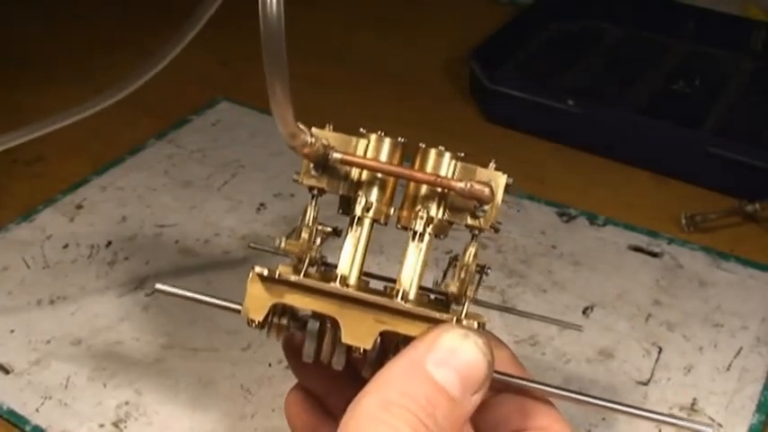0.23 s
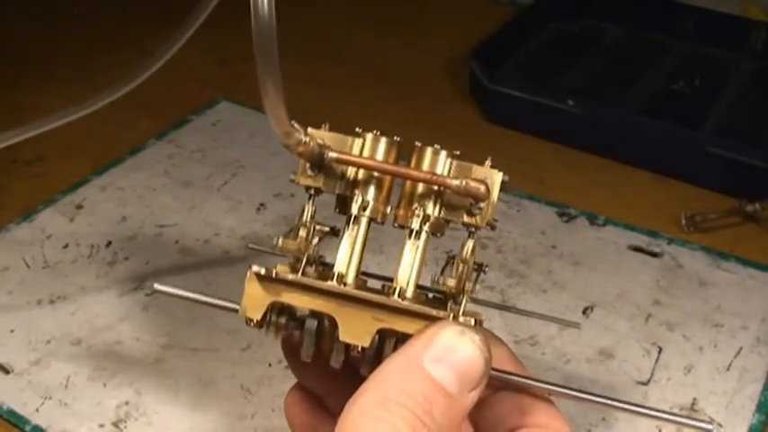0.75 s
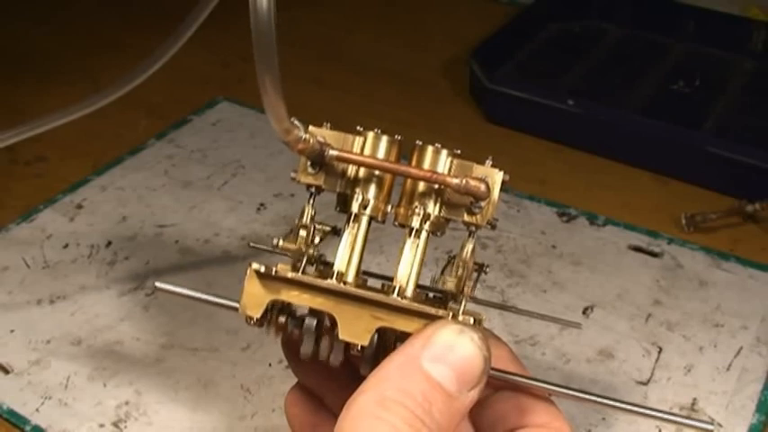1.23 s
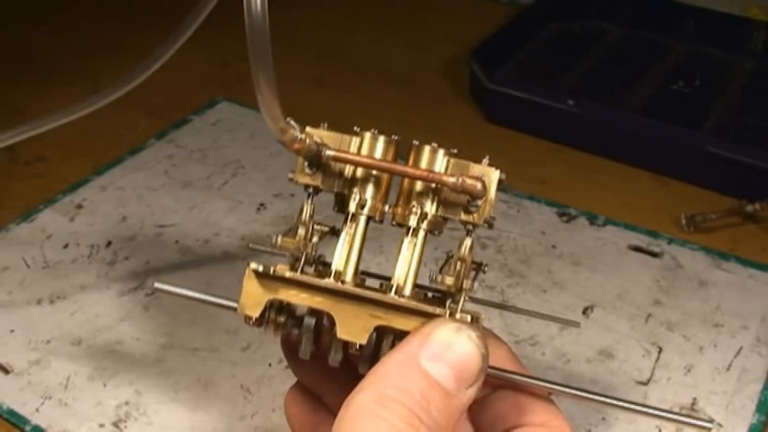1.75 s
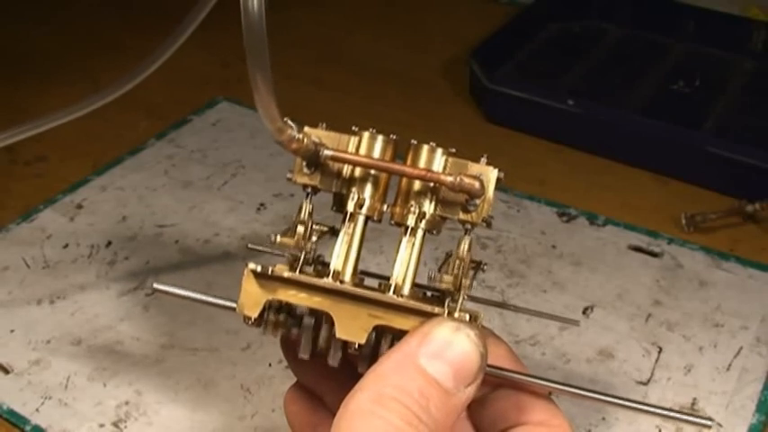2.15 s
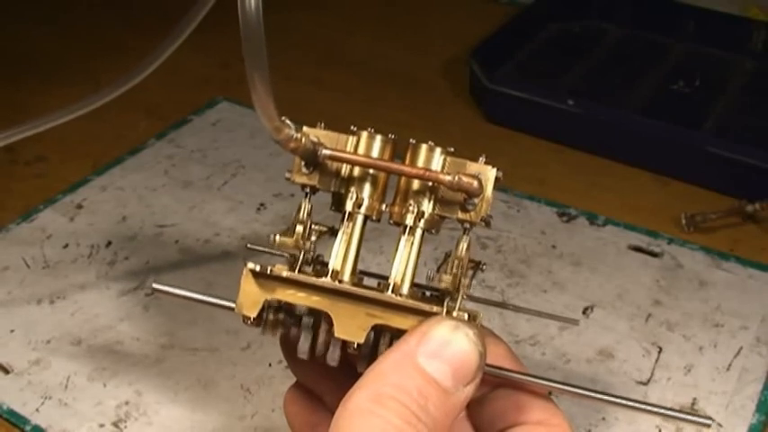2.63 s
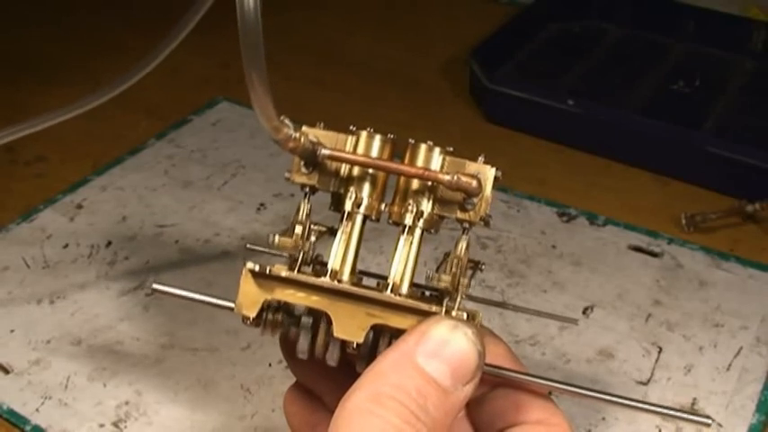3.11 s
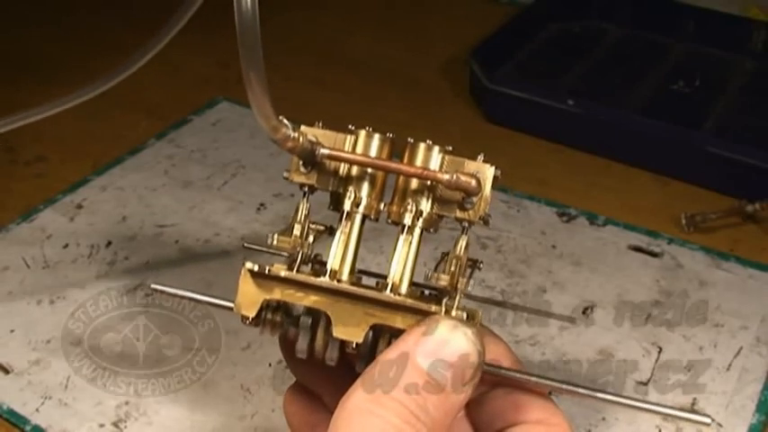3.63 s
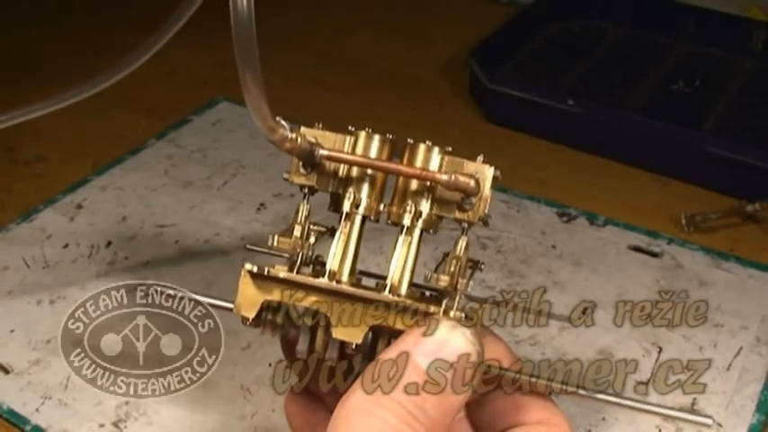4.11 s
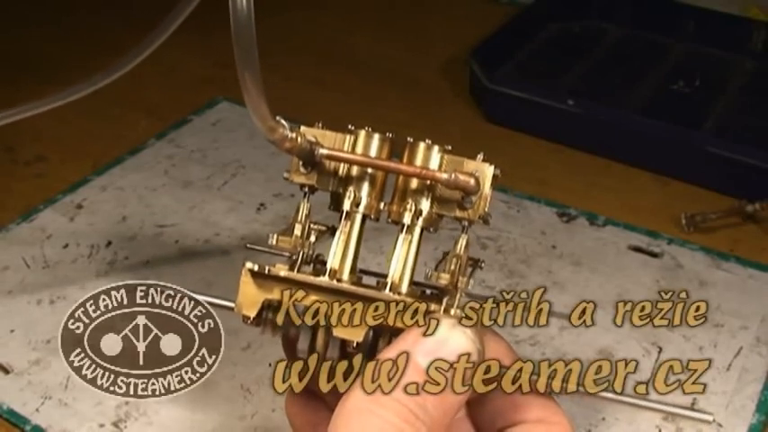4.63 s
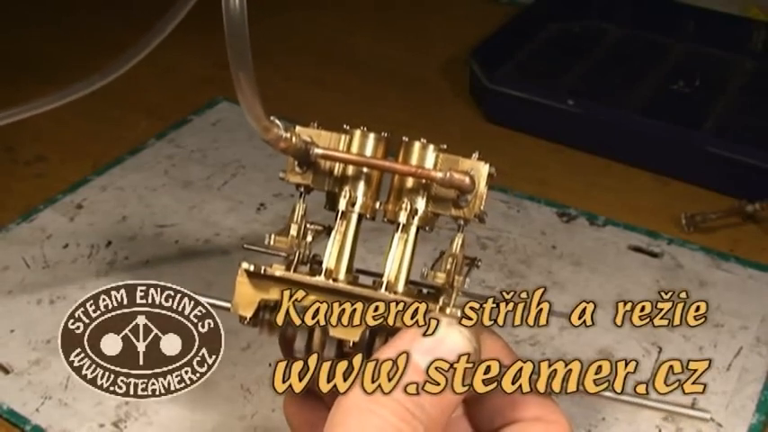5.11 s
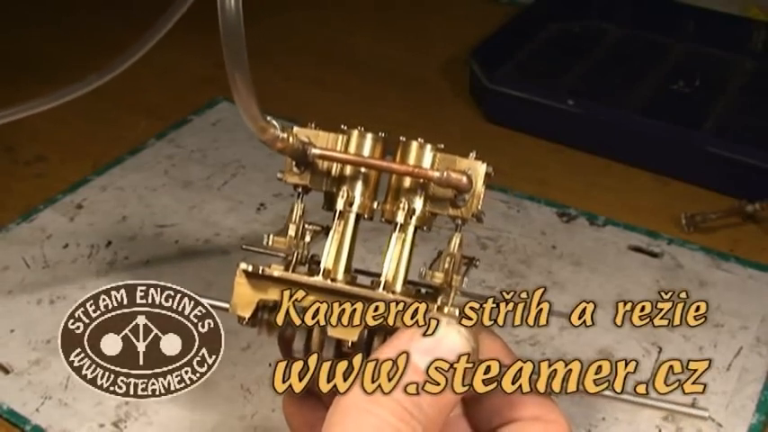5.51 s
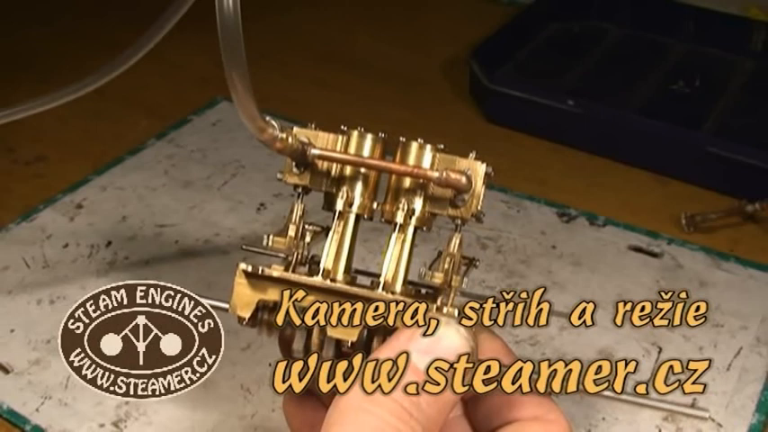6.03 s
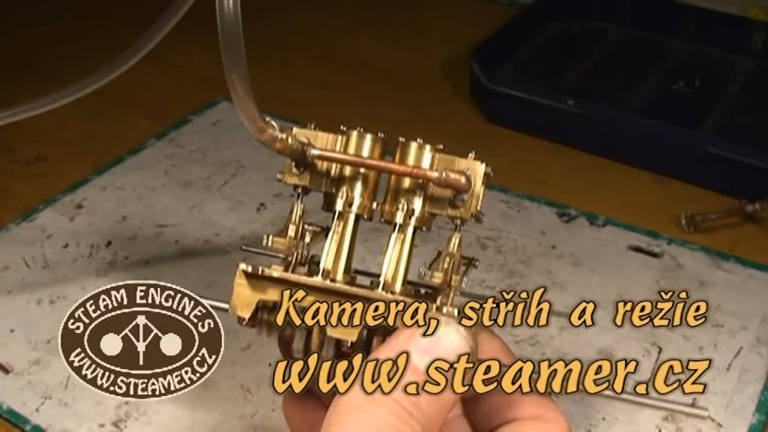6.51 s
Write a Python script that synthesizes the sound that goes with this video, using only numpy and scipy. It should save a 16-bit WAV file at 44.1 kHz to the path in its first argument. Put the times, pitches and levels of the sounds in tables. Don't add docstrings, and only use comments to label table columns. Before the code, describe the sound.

A hand-held miniature two-cylinder engine running on air in a quiet workshop, miked very close. Bright hiss leaks constantly while quick soft pops and metallic ticks slow slightly into an uneven putter. Around three seconds the valve gear clatters sharply, hiss surges, and the pops race upward, fusing into a rough, steady buzz that continues to the end.

```python
import sys
import numpy as np
from scipy import signal
from scipy.fft import rfft, irfft, next_fast_len
from scipy.io import wavfile
from scipy.ndimage import uniform_filter1d

SR = 44100
rng = np.random.default_rng(int(sys.argv[2]) if len(sys.argv) > 2 else 0)


def dump(signal):
    limited = np.clip(np.atleast_2d(signal).T, -1, 1)
    pcm = np.round(limited * 32767).astype(np.int16)
    wavfile.write(sys.argv[1], SR, pcm)


def volts_from_decibels(level):
    exponent = np.asarray(level, float) / 20
    return 10 ** exponent


N = 298101


def unit(x):
    return x / np.sqrt(np.mean(x ** 2))


def curve(table):
    s, *columns = np.transpose(table)
    return [np.interp(np.arange(N) / SR, s, c) for c in columns]


def at_hz(table, hz, column=1):
    table = np.array(table, float)
    return np.interp(np.log(hz + 1), np.log(table[:, 0]), table[:, column])


def shape(x, gain):
    size = next_fast_len(N)
    return irfft(rfft(x, size) * gain(np.arange(size // 2 + 1) * SR / size), size)[:N]


def ring(x, modes):
    def response(f):
        return sum(volts_from_decibels(db) * 1j * f * w / (hz ** 2 - f ** 2 + 1j * f * w) for hz, w, db in modes)
    return shape(x, response)


def walk(rate):
    k = int(SR / rate)
    return unit(uniform_filter1d(uniform_filter1d(rng.standard_normal(N), k), k))


def strikes(angle, places, sizes, jitter, scatter_db):
    turns = np.arange(-1, int(angle[-1]) + 1)[:, None]
    chance = rng.standard_normal((len(turns), len(places), 2))
    crank = turns + places + jitter * chance[..., 0]
    when = np.interp(crank, angle, np.arange(N), left=N, right=N).ravel()
    size = (sizes * volts_from_decibels(scatter_db * chance[..., 1])).ravel()
    first = when.astype(int)
    late = when - first
    out = np.bincount(first, size * (1 - late), N + 2) + np.bincount(first + 1, size * late, N + 2)
    return out[:N]


def steady(x, span_s=0.49):
    return x / np.sqrt(uniform_filter1d(x ** 2, int(span_s * SR)) + 1e-18)


# time_s, turns_hz
SPEED = [(0.0, 19.39), (0.277, 17.51), (0.677, 15.88), (1.279, 14.79), (2.458, 14.49), (2.994, 13.59),
         (3.089, 16.17), (3.375, 28.16), (3.511, 40.9), (3.718, 55.22), (3.797, 57.66), (4.363, 59.05),
         (4.597, 62.28), (4.979, 63.41), (5.48, 62.9), (5.814, 63.42), (6.349, 63.19), (6.76, 62.12)]


def crank():
    hz, = curve(SPEED)
    first_pop_turns = 0.183
    return hz, np.cumsum(hz) / SR - first_pop_turns


# frequency_hz, density_db
ROOM = [(20, -30), (45, -22), (70, -6), (150, 7), (400, -7), (1500, -0.5), (3000, -49)]


def room(racing):
    level_db, duck_db = -58.5, 13
    noise = unit(shape(rng.standard_normal(N), lambda f: volts_from_decibels(at_hz(ROOM, f))))
    return volts_from_decibels(level_db - duck_db * racing) * noise


# time_s, level_db
RUMBLE = [(0, -71), (.8, -66), (1.3, -60), (3.4, -62), (3.7, -59), (4.3, -62), (5, -70), (6.76, -72)]


def rumble():
    level_db, = curve(RUMBLE)
    return volts_from_decibels(level_db) * unit(ring(rng.standard_normal(N), [(36, 30, 0)]))


# frequency_hz, width_hz, level_db
CAVITIES = [(4130, 420, -4), (4610, 53, -4), (6210, 110, -2), (6500, 200, 0), (6740, 120, -1),
            (7480, 92, -2), (8230, 49, -3), (8680, 130, -4), (9120, 130, -1), (10000, 200, -2),
            (10400, 240, -3), (11600, 89, 0), (11800, 86, -1), (12100, 50, -1), (12400, 43, -1),
            (12700, 240, 0), (13200, 190, -3), (14100, 120, -3), (15200, 140, -5)]


def air(spectrum, cavity_db):
    def gain(f):
        peaks = sum(volts_from_decibels(db / 2) / (1 + (2 * (f - hz) / w) ** 2) for hz, w, db in CAVITIES)
        return volts_from_decibels(at_hz(spectrum, f) + cavity_db * peaks) / (1 + (55 / (f + 1)) ** 2)
    return unit(shape(rng.standard_normal(N), gain))


# frequency_hz, density_db
LEAK_SLOW = [(760, -36), (1300, -26), (1620, -11), (2700, -6.5), (3290, -5), (4130, -3.5), (5250, -4),
             (6610, 6), (7180, 0), (9320, -0.5), (11000, -5.5), (13200, -6.5), (15700, -10.5)]
LEAK_FAST = [(710, -9.5), (1200, -13.5), (1350, -11.5), (1600, -6.5), (1730, -12), (1890, -13),
             (2360, -8.5), (2630, -8.5), (3330, -5.5), (4230, -5.5), (4860, -2), (6290, 0.5), (7080, 0.5),
             (12900, 0.5), (15700, -2.5)]
SHUT_TURNS = [.175, .395, .95]


def leak(angle, valve):
    width_turns, shut_db = 0.03, -4
    slow = volts_from_decibels(-0.5) * air(LEAK_SLOW, cavity_db=3.0)
    fast = volts_from_decibels(3.0) * air(LEAK_FAST, cavity_db=5.0)
    sound = np.sqrt(1 - valve) * slow + np.sqrt(valve) * fast
    sound = sound * volts_from_decibels(0.5 * walk(51) + 0.8 * walk(440))
    shut = sum(np.exp(-((angle % 1 - place) / width_turns) ** 2) for place in SHUT_TURNS)
    ripple_db = 0.13 * valve * np.cos(2 * np.pi * (angle - 0.37))
    return sound * volts_from_decibels(shut_db * (1 - valve) * shut + ripple_db)


# angle_turns, puff_db, knock_db, tick_db
SLOW_TURN = [(.01, 12, -18, -22), (0.055, -26, -4, 9.5), (0.095, -42, 4, -35), (0.245, 19, -21, -5),
             (0.3, -19, 2, -27), (0.456, 16, -1, -30), (0.53, -3, -6, -26), (0.584, -33, 0.5, -27),
             (.67, 1.5, -7, 6.5), (0.881, 3, -24, -5)]
# frequency_hz, density_db
PUFF = [(800, -32), (2000, -8), (4500, -8), (6300, 5), (8500, 1.5), (10500, -3), (12000, -11), (15500, -15)]


def hiss(angle, valve, top_db, push_db):
    places, puff_db = np.transpose(SLOW_TURN)[:2]
    t = np.arange(1400) / SR
    swell = (1 - np.exp(-t / 0.0012)) * np.exp(-t / 0.004)

    def puffs():
        hits = strikes(angle, places, volts_from_decibels(puff_db), jitter=0.003, scatter_db=1.0)
        return steady(np.convolve(hits, swell)[:N])
    jet = air(PUFF, cavity_db=4.0)
    jet_top = shape(jet, lambda f: 1 / (1 + (7600 / (f + 1)) ** 10))
    puffing = puffs() * (jet - jet_top) + puffs() * jet_top
    sound = leak(angle, valve) + volts_from_decibels(push_db) * puffing
    top = shape(sound, lambda f: 1 / (1 + (10800 / (f + 1)) ** 12))
    return sound + top * (volts_from_decibels(top_db - (-10.0 + 7.8 * valve)) - 1)


def jets_level(hz):
    slow_db, fast_db, from_hz, span_hz = -4.5, 0.8, 44, 10
    return slow_db + (fast_db - slow_db) * np.clip((hz - from_hz) / span_hz, 0, 1)


POPS = [(0, 0.97, -0.51), (0.028, -0.37, -0.18), (0.226, 0.76, 0.044), (0.319, 0.95, -0.17),
        (0.418, 0.47, 0.35), (.455, -0.34, -1.2), (0.496, 0.66, 0.91), (.62, 0.24, -0.18),
        (0.779, 0.05, -0.012), (0.869, -0.13, 0.75)]
# frequency_hz, width_hz, level_db
POP = [(223, 145, 35.5), (397, 60, 19), (550, 50, 1), (700, 81, 11)]
# frequency_hz, width_hz, level_db
SURGE = [(40, 46, -19), (95, 52, 11.5), (176, 61, -4.5)]


def pops(angle):
    places, sharp, soft = np.transpose(POPS)
    pop = ring(strikes(angle, places, sharp, jitter=0.0025, scatter_db=1.2), POP)
    push = strikes(angle, places, soft, jitter=0.003, scatter_db=1.2)
    surge = ring(np.convolve(push, np.hanning(160))[:N], SURGE)
    return steady(unit(pop) + volts_from_decibels(-1.5) * unit(surge))


# crank_multiple, coast_fast_db, coast_slow_db, tick_over_db
COAST = [(4.96, 2, 1, -10.5), (5.94, -6, -17.5, -3), (7.17, -9, 11, -24), (8.08, -5, -21.0, 2),
         (9, 1.0, -1, -21), (10.05, -4, 0, -2.5), (11, -5.5, -7, -6), (12, -8, -16, -11),
         (12.86, -1, -1, -17.5), (14, -14, -7, 2.5), (14.93, -12.5, -4, -16), (16.04, -5, -8, -9),
         (16.67, -7.5, -17, -11), (18, -18, -8, -3), (18.9, -28, -22, -2.5), (20, -8, -26.0, -21),
         (21, -17, -11, -34), (21.7, -20, -17.5, -3), (23, -16, -15.0, -12), (24, -25, -13.5, -15),
         (25, -21.5, -8, -5), (25.87, -9, -21.5, -17), (27, -35, -12, -27.0), (28, -23, -27, -9.0),
         (28.3, -21, -33, -12), (29.85, -13.0, -29, -22.5), (30.5, -15.5, -23.0, -36),
         (32.1, -21, -19, -20), (33.3, -16, -28.5, -20), (33.5, -30, -19, -14), (35.3, -26, -16, -18.5),
         (36, -21, -24.5, -25), (36.3, -12, -23.5, -30.0), (38.5, -16, -33.5, -17.5)]
COAST_STAGES_HZ = [14.7, 14.94, 18]


def coast_tone(angle, stage_hz, wobble):
    slow = slice(N // 2)
    calm = [w[slow] ** 0.24 for w in wobble]
    tone = 0
    for (k, *levels_db), start in zip(COAST, rng.random(len(COAST))):
        k = round(k)
        size = np.interp(stage_hz[slow], COAST_STAGES_HZ, volts_from_decibels(np.array(levels_db[::-1])))
        tone = tone + size * calm[k % len(calm)] * np.sin(2 * np.pi * (k * angle[slow] + start))
    return np.pad(steady(tone), (0, N - N // 2))


# frequency_hz, width_hz, level_db
EXHAUST = [(110.8, 10.5, 18.5), (185, 74, 4.5), (282, 59, 8), (366, 42, 10.5), (396, 15, 3),
           (541, 53, 13.5), (686, 43, 14), (886, 77, 12), (987, 40, 12.5)]


def lift(f):
    return volts_from_decibels(sum(db / (1 + (2 * (f - centre) / w) ** 2) for centre, w, db in EXHAUST))


def exhaust(angle, hz, valve, full, boom_db, exhaust_db):
    early = np.arange(N) < 2 * SR
    idle_hz, idle_share, coast_share = 14.5, 0.11, 0.61
    wobble = [volts_from_decibels((1.3 + 1.0 * (1 - valve)) * walk(14)) for _ in range(5)]
    coasting = np.clip((hz - 16) / 1.8, 0, 1) * early
    stage_hz = np.where(early, hz, idle_hz)
    clear = coast_tone(angle, stage_hz, wobble)
    share = np.interp(stage_hz, COAST_STAGES_HZ[:2], (idle_share, coast_share))
    share = np.clip(share, 0, 1) * (1 - valve) ** 2
    sound = np.sqrt(1 - valve) * volts_from_decibels(-6.5) * pops(angle)
    sound = sound + np.sqrt(valve) * buzz(angle, hz, full, wobble)
    lull = np.exp(-((angle % 1 - 0.9) / 0.066) ** 2)
    lull_db = -11.5 * (1 - valve) * (1.5 - coasting) * lull
    sound = np.sqrt(1 - share) * volts_from_decibels(lull_db) * shape(sound, lift)
    sound = sound + np.sqrt(share) * volts_from_decibels(4 + 0.94 * lull_db) * clear
    low = shape(sound, lambda f: 1 / (1 + (f / 137) ** 12))
    deep = shape(low, lambda f: 1 / (1 + (f / 60) ** 8))
    boom = volts_from_decibels(boom_db) * steady(low - deep, span_s=0.05)
    bark = volts_from_decibels(exhaust_db) * steady(sound - low, span_s=0.11)
    return boom + bark + volts_from_decibels(-73.0 - 24 * valve) * steady(deep)


BENCH_ORDERS_DB = [-45.5, -49, -37.5, -48, -52, -70, -57.5]


def boom_level(hz):
    mode_hz, width_hz, floor_db = 108.4, 6.46, -82
    orders = np.arange(len(BENCH_ORDERS_DB))[:, None] + 2
    spread_hz = width_hz * (orders / 2) ** 0.27
    tuned = np.exp(-((orders * hz - mode_hz) / spread_hz) ** 2 / 2)
    return 10 * np.log10(volts_from_decibels(floor_db) ** 2 + volts_from_decibels(np.array(BENCH_ORDERS_DB)) ** 2 @ tuned)


def octaves(hz):
    idle_hz, knee_hz = 14.5, 27
    return np.log2(np.minimum(hz, knee_hz) / idle_hz), np.log2(np.maximum(hz, knee_hz) / knee_hz)


def exhaust_level(hz):
    low, high = octaves(hz)
    node_db = -3 * np.exp(-((hz * 4 - 221) / 14.5) ** 2)
    return -50.5 + 13.5 * low + 3.5 * high + node_db


# frequency_hz, width_hz, level_db
KNOCK = [(920, 660, -11), (1630, 120, -2), (1990, 590, 1), (2670, 125, 3)]
# frequency_hz, width_hz, level_db
TICK = [(3730, 280, -1.5), (4120, 400, 8.5), (4320, 250, -9)]
# angle_turns, knock_db, tick_db
BRISK_TURN = [(.07, -6, -14), (.14, -18, -29), (.22, -4, -1), (.3, -7, -1), (.575, -2, 0), (.63, -14, 1),
              (.69, -15, 0), (.8, -2, -11), (.95, -10, -12)]
FAST_TURN = [(.08, -3, -12), (.155, 1.5, -18), (.22, -1.5, 1), (.31, -9, 0.5), (.59, 2, -19),
             (.635, -4.5, -4), (.72, -10, -7), (.77, 1, 2.5), (.96, -11, -0.5)]


def linkage(angle, racing, full):
    places, _, *parts_db = np.transpose(SLOW_TURN)
    rattle = np.sign(rng.standard_normal(N))
    smear = np.exp(-np.arange(400) / (0.0049 * SR))
    slow = []
    for db in parts_db:
        hits = strikes(angle, places, volts_from_decibels(db), jitter=0.0044, scatter_db=2.0)
        slow.append(np.convolve(hits, smear)[:N] * rattle)
    fast = [0, 0]
    for table, share in ((BRISK_TURN, 1 - full), (FAST_TURN, full)):
        places, *parts_db = np.transpose(table)
        for i, play_turns in enumerate((0.004, 0.0014)):
            hits = strikes(angle, places, volts_from_decibels(parts_db[i]), jitter=play_turns, scatter_db=1.5)
            fast[i] = fast[i] + share * hits
    slow = volts_from_decibels(-4.0) * steady(ring(slow[0], KNOCK)) + volts_from_decibels(-2.5) * steady(ring(slow[1], TICK))
    fast = volts_from_decibels(-5.0) * steady(ring(fast[0], KNOCK[2:])) + volts_from_decibels(0.3) * steady(ring(fast[1], TICK))
    return np.sqrt(1 - racing) * slow + np.sqrt(racing) * fast


def linkage_level(hz):
    low, high = octaves(hz)
    return -41 + 2.5 * (low + high) + 3 * np.exp(-((hz - 21.9) / 2.8) ** 2)


# start_s, peak_db
SLAPS = [(0.048, -21), (0.102, -21.5), (0.1176, -26), (0.1545, -25), (0.2102, -22), (0.266, -31),
         (0.295, -29), (0.323, -24), (3.1454, -24), (3.182, -23), (3.1976, -21), (3.231, -21), (3.275, -16),
         (3.288, -18), (3.316, -26), (3.3278, -19), (3.354, -17.5), (3.365, -24), (3.3877, -21),
         (3.397, -24), (3.435, -25), (3.449, -24)]
# frequency_hz, width_hz, level_db
SLAP = [(4070, 540, 2.5), (4620, 790, -3.5)]


def slaps():
    s, db = np.transpose(SLAPS)
    decay_s, chatter_hz = 0.0015, 4200
    hits = np.bincount((s * SR).astype(int), volts_from_decibels(db), N)
    envelope = np.convolve(hits, np.exp(-np.arange(500) / (decay_s * SR)))[:N]
    phase = 2 * np.pi * chatter_hz * np.arange(N) / SR + 1.7 * walk(1500)
    return ring(envelope * np.cos(phase), SLAP)


def lined_up(k, ports, lag):
    places, steps = np.transpose(ports)
    return np.exp(1j * (np.angle(np.exp(-2j * np.pi * k * places) @ steps) + lag))


# crank_multiple, pulling_up_db, at_58_hz_db, at_63_hz_db
BUZZ = [(1, -15.0, -33, -54), (2, -8, 0, -28), (2.976, -11.0, -11, -15.0), (3.999, 6, 0.5, 0.0),
        (5, -6, -10, -18.0), (5.967, -12, -2.5, -9.0), (6.9, -4.5, -8.5, -25.5), (7.98, -5.5, -18.0, -16),
        (8.99, -9.5, -8.5, -14), (9.97, -14.0, -14, -17.5), (10.93, -8, -9, -10.5),
        (11.9, -13.5, -10, -20.5), (13, -14.0, -18.0, -14.5), (14, -23, -11, -16.5), (15, -11, -11, -19),
        (16, -18.0, -15.5, -22), (17.12, -16, -12, -20), (18, -20, -21, -19), (19, -10.5, -30, -27),
        (19.85, -10, -18, -22.5), (21, -24, -14, -19.5), (22, -21, -21.0, -23), (23, -15, -31, -16.5),
        (24, -9, -18.0, -24.5), (25.05, -10, -13, -14.5), (25.76, -28, -14, -18), (27, -16, -27, -22),
        (28, -14.0, -19, -43), (29, -16.5, -19, -19), (30, -13.5, -14, -26), (31, -21, -20, -18),
        (32, -23, -14, -18), (33, -19, -16, -21.5), (34, -15, -19, -25), (34.56, -14, -24, -19),
        (35.5, -14, -36, -32), (37, -13.5, -20, -27), (38.2, -12.5, -10.5, -21)]
BRISK_PORTS = [(.096, 1), (.113, -.58), (.331, -.55), (.593, .84), (.721, .71), (.937, .14)]
FAST_PORTS = [(.146, 1), (.209, .42), (.267, .81), (.485, -.7), (.499, -.29), (.785, -.86)]


def buzz(angle, hz, full, wobble):
    sound, fast = np.zeros(N), slice(3 * SR, N)
    hz, angle, full = hz[fast], angle[fast], full[fast]
    climbing = np.clip((53 - hz) / 9.5, 0, 1)
    edge = volts_from_decibels(-9.5 * np.clip((46 - hz) / 16, 0, 1))
    for k, climb_db, brisk_db, full_db in BUZZ:
        k = round(k)
        brisk = climbing * volts_from_decibels(climb_db - 3.5) + (1 - climbing) * volts_from_decibels(brisk_db) / lift(58.4 * k)
        size = (1 - full) * brisk + full * volts_from_decibels(full_db) / lift(63.1 * k)
        if k > 16:
            size = size * edge
        phasor = lined_up(k, BRISK_PORTS, -2.03)
        turn = np.angle(lined_up(k, FAST_PORTS, 1.25) / phasor)
        start = np.angle(phasor) + full * turn
        sound[fast] += wobble[k % len(wobble)][fast] * size * np.cos(2 * np.pi * k * angle + start)
    return steady(sound, span_s=0.24)


# frequency_hz, level_db
BENCH_RIPPLE = [(2330, -1.5), (2840, -0.9), (3400, -2.4), (3530, 3), (3700, -0.5), (4440, -0.1),
                (4650, 3.1), (4870, -2), (5300, -3.5), (5730, 5), (6070, 1), (6290, -2.5), (6630, -5.5),
                (6930, 1), (7240, -8.5), (7490, 2), (8230, 1.5), (8570, -3.5), (8910, -9), (9090, 3.5),
                (9520, 0), (10290, -8.5), (10850, -7), (11540, 1), (11670, 1.5), (12020, -3), (12270, -2),
                (12580, -0.5), (12880, 4.5), (13090, -10), (13780, -4), (14210, 4), (14470, -2.5),
                (14940, -1.6)]


def reflections(x):
    width_hz = 92

    def gain(f):
        return volts_from_decibels(sum(db / (1 + (2 * (f - hz) / width_hz) ** 2) for hz, db in BENCH_RIPPLE))
    return shape(x, gain)


# frequency_hz, right_lead_share, unrelated_part_db
PORTS = [(30, 0.044, -4), (107, 0.05, -69), (344, 0.15, -21), (710, 0.14, -7.5), (1330, 0.081, -7.5),
         (1510, 0.0028, -74), (3700, 0.02, -63), (5940, 0.1, -15.5), (9100, 0.068, -10), (11280, .05, -5),
         (11800, 0.0026, -70)]


def two_ports(mid):
    echoes = unit(rng.standard_normal(3600) * np.exp(-np.arange(3600) / 900)) / 60
    unrelated = signal.fftconvolve(mid, echoes)[:N]
    side = shape(mid, lambda f: at_hz(PORTS, f))
    side = side + shape(unrelated, lambda f: volts_from_decibels(at_hz(PORTS, f, column=2)))
    return np.array([mid - side, mid + side])


# time_s, level_db
AIR = [(0, -31.5), (.3, -32.5), (1.7, -32.5), (2.0, -32), (3.03, -32), (3.24, -28.5), (3.55, -27.5),
       (3.67, -30.5), (6.76, -29.5)]


def scene():
    hz, angle = crank()
    hiss_db, = curve(AIR)
    racing = np.clip((hz - 20) / 18, 0, 1)
    full = np.clip((hz - 59.5) / 3, 0, 1)
    valve = np.clip((hz - 17.5) / 12, 0, 1) * (np.arange(N) > 3 * SR)
    merged = np.clip((hz - 13.5) / 13.7, 0, 1)
    idle_air_db = np.interp(2.5, *np.transpose(AIR))
    push_db = (1 - merged) * (-2.5 + 3.4 * (hiss_db - idle_air_db)) - 11.0 * merged
    mid = volts_from_decibels(hiss_db) * hiss(angle, valve, jets_level(hz), push_db)
    mid = mid + exhaust(angle, hz, valve, full, boom_level(hz), exhaust_level(hz))
    mid = mid + volts_from_decibels(linkage_level(hz) - 4.0) * linkage(angle, racing, full)
    mid = reflections(mid) + rumble() + room(racing)
    return two_ports(mid) + slaps()


def low_pass(x):
    return signal.sosfilt(signal.butter(12, 16480, fs=SR, output="sos"), x)


def record(dry):
    top_hz = 15720
    mix = np.array([shape(channel, lambda f: f < top_hz) for channel in dry])
    return low_pass(mix)


dry = scene()
out = record(dry)
dump(out)
```